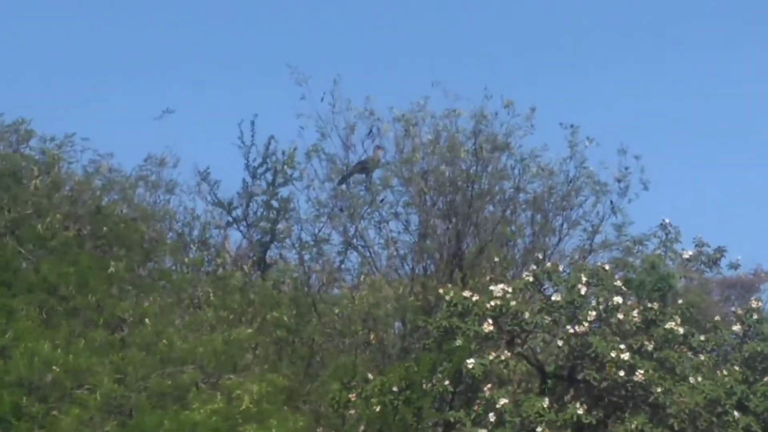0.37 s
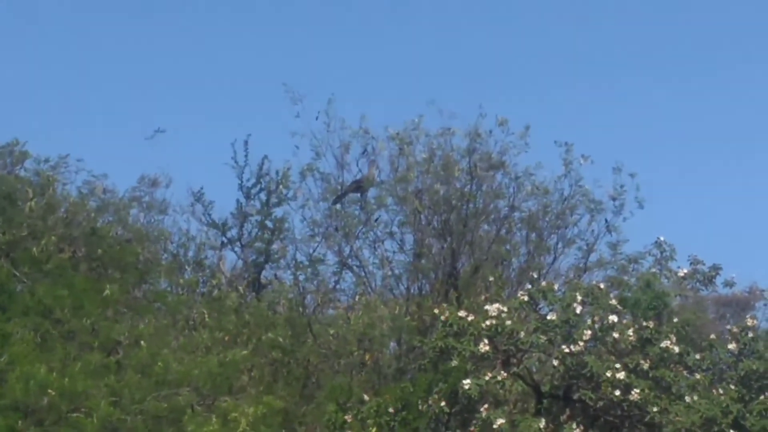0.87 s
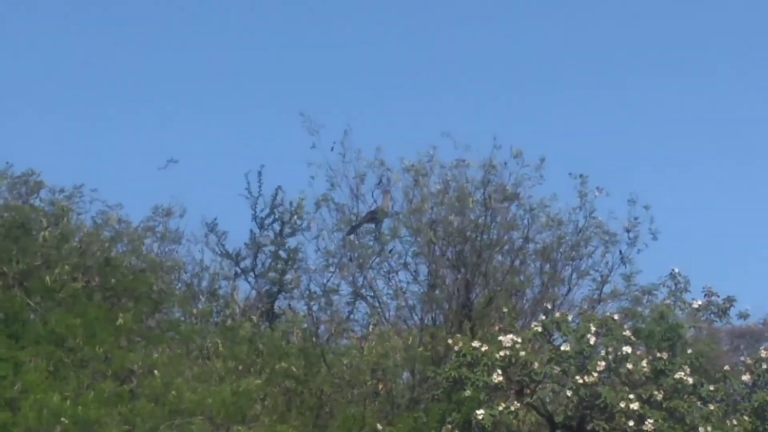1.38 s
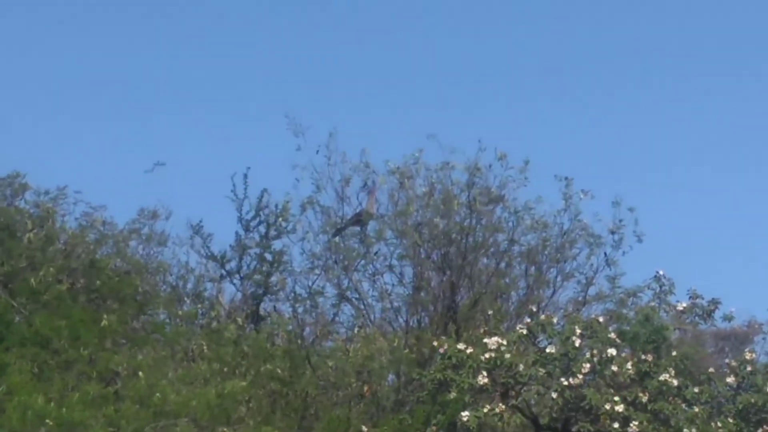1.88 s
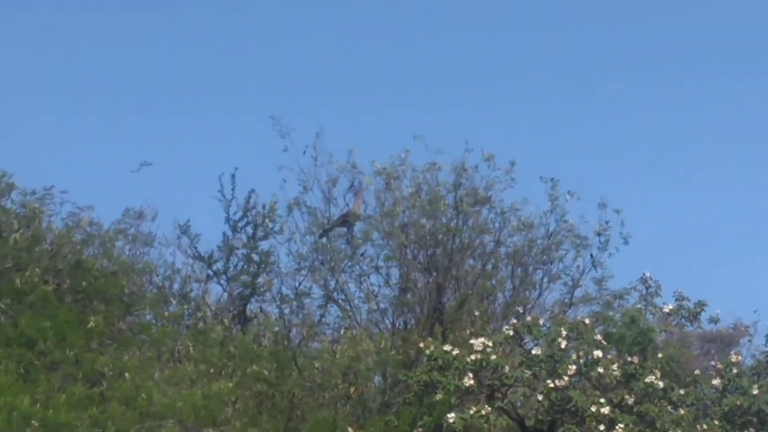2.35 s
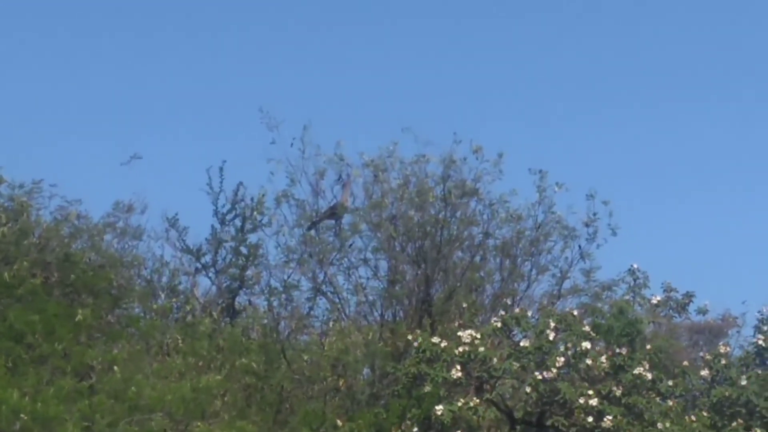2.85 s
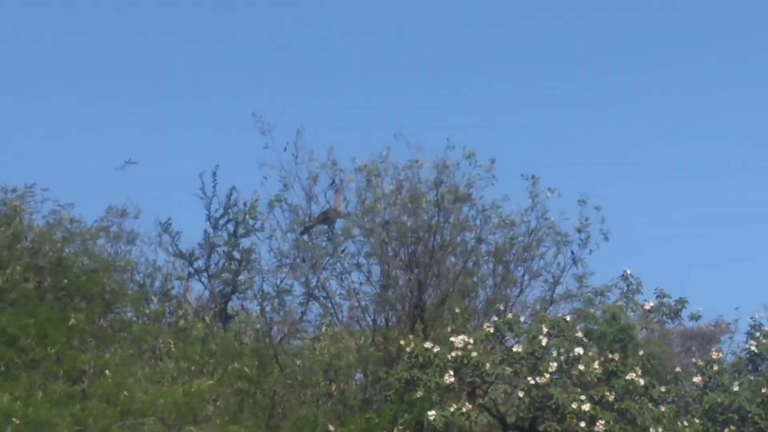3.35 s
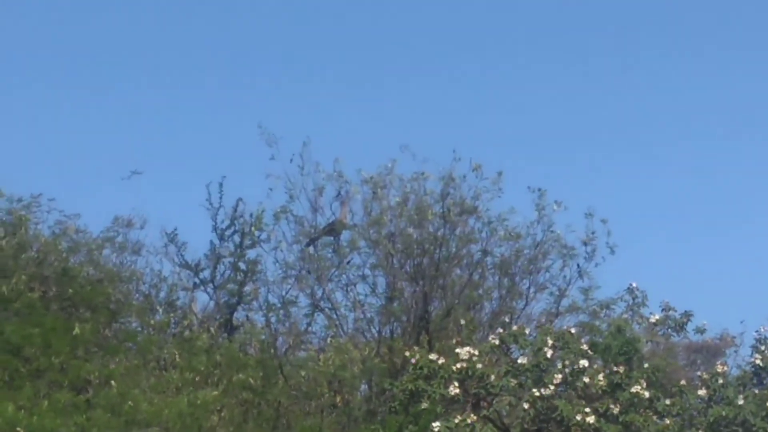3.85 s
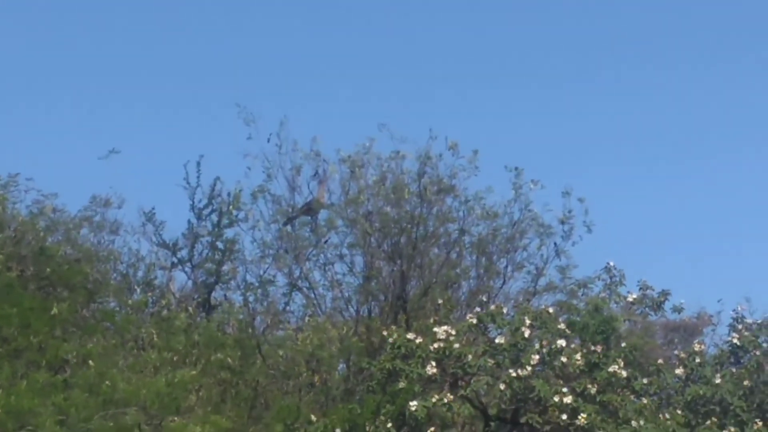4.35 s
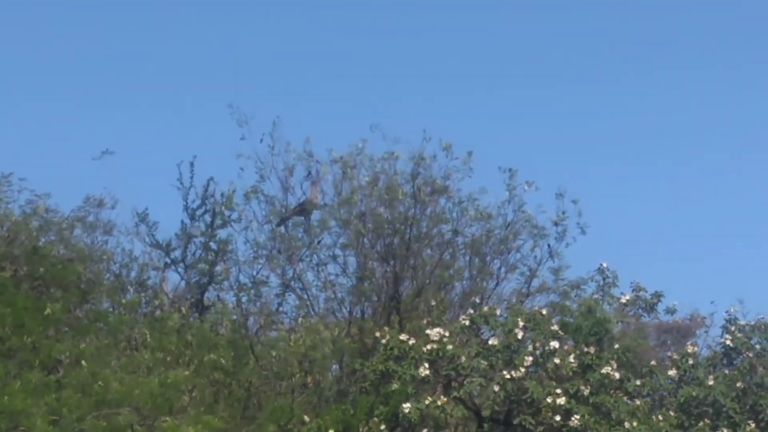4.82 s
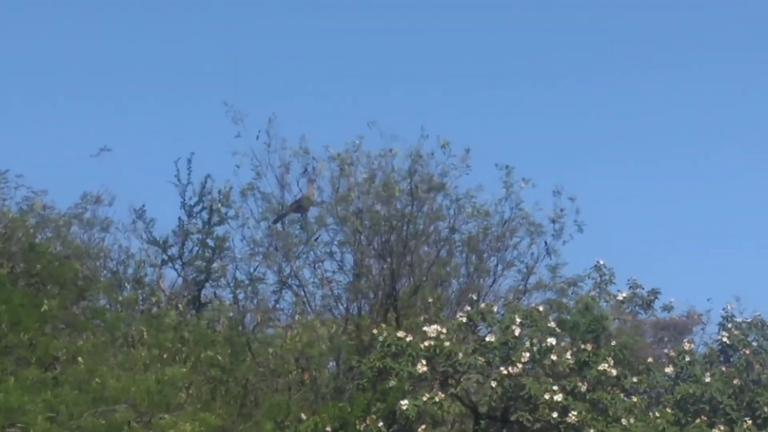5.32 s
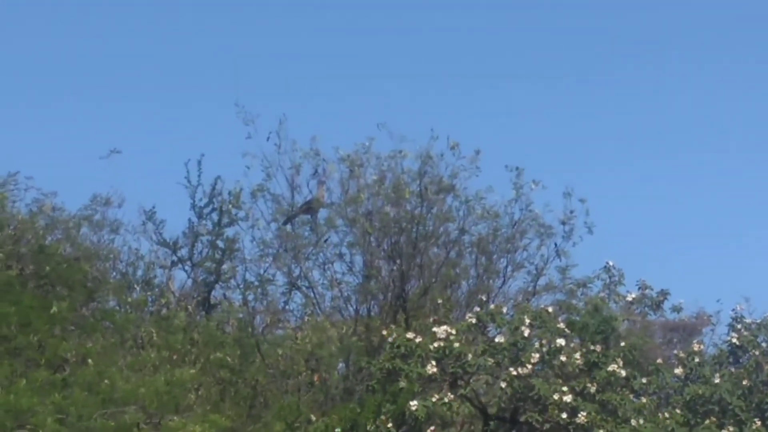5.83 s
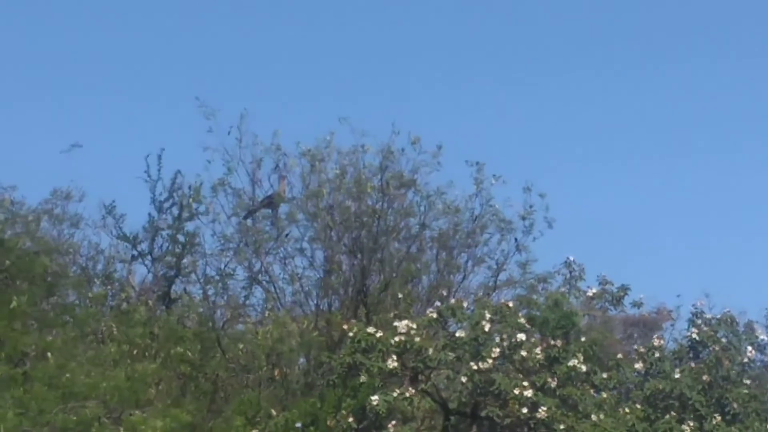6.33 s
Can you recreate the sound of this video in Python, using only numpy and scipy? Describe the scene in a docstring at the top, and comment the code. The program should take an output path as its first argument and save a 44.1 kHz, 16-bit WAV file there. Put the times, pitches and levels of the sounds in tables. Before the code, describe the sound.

A large bird gives raucous, rasping three-part honks that swell louder, answered by fainter hoarse calls farther off among scrubby trees, over low hum.

```python
"""A large bird in a scrubby tree gives a faint single call, then four raucous three-part honks: pulses and breath
ring its throat and beak. Others of its kind answer farther off, one a clearer, higher voice of summed harmonics.
A small bird chips and insects tick in sliding sines; insect hiss, snaps, knocks and distant hum are shaped noise.
A two-port microphone widens the picture by feeding each side, delayed and inverted, into the other."""
import sys
import numpy as np
from scipy import signal
from scipy.fft import rfft, irfft
from scipy.io import wavfile
from scipy.ndimage import uniform_filter1d

SR = 44100
rng = np.random.default_rng(int(sys.argv[2]) if len(sys.argv) > 2 else 0)


def ratio_of_db(decibels):
    """Turn decibels (scalar or array-like) into linear amplitude factors; 0 dB maps to 1."""
    return 10 ** (np.asarray(decibels, float) / 20)


def file_out(sig):
    """Save sig as 16-bit WAV at sys.argv[1]."""
    # one column per channel
    cols = np.atleast_2d(sig).T
    # limit, then scale
    lim = np.clip(cols, -1, 1)
    pcm = np.round(lim * 32767).astype(np.int16)
    wavfile.write(sys.argv[1], SR, pcm)


N = 295470
HZ = np.maximum(np.fft.rfftfreq(N, 1 / SR), 1)


def rms_one(x):
    """Normalisation: scale to rms 1."""
    return x / np.sqrt(np.mean(x ** 2) + 1e-20)


def at_hz(points):
    """Interpolation on a logarithmic frequency axis: a (Hz, value) table read at every frequency."""
    return np.interp(np.log(HZ), np.log(np.array(points)[:, 0]), np.array(points)[:, 1])


def coloured(x, points):
    """Linear filtering: multiply the spectrum by a (Hz, dB) response."""
    return irfft(rfft(x) * ratio_of_db(at_hz(points)), N)


def phrases(tables, level):
    """Envelope control: join tables in time; the level column becomes a gain, zero between tables."""
    t = np.arange(N) / SR
    s, *columns = np.transpose(np.concatenate(tables))
    columns = [np.interp(t, s, c) for c in columns]
    sounding = sum((t > rows[0][0]) & (t < rows[-1][0]) for rows in tables) > 0
    columns[level] = ratio_of_db(columns[level]) * uniform_filter1d(sounding * 1.0, size=300)
    return columns


def notes(rows, shape):
    """Time scaling: stretch a note shape over each row, as tables of (s, pitch Hz, level dB, overtones dB)."""
    return [[(s + u * length, hz * ratio, db + rel_db, top_db) for u, ratio, rel_db in shape]
            for s, length, hz, db, top_db in rows]


def drift(rate_hz):
    """Low-passed noise: a random wander of rms 1, two equal poles at rate_hz."""
    r = np.exp(-2 * np.pi * rate_hz / SR)
    wander = signal.lfilter([1], [1, -2 * r, r * r], rng.standard_normal(N + 9000))
    return rms_one(wander[9000:])  # skip the filter's start


def rings(x, hz, width_hz):
    """Resonance by heterodyning: shift a centre that may move to zero, low-pass twice, shift back; rms 1."""
    turn = np.exp(2j * np.pi * np.cumsum(hz * np.ones(N)) / SR)
    r = np.exp(-np.pi * width_hz * 1.5 / SR)  # each pass is wider, since two in a row narrow the band
    return rms_one(np.real(signal.lfilter([1], [1, -2 * r, r * r], x / turn) * turn))


def evened(x, share):
    """Level compression: take out part of the slow level wander; rms 1."""
    return rms_one(x / (uniform_filter1d(x ** 2, size=900) + 1e-9) ** (share / 2))


def placed(x, lead_ms, pan_db):
    """Interaural-like cues: above the bass the left port leads by lead_ms and is pan_db louder."""
    sided = 1 / (1 + (785 / HZ) ** 2)  # the close ports hear the bass alike
    half = ratio_of_db(pan_db * sided / 2) * np.exp(1j * np.pi * HZ * sided * lead_ms / 1000)
    return irfft(rfft(x) * np.array([half, 1 / half]), N)


def among_trees(x, level_db, t60):
    """Diffuse reverberation: dense scatter off trunks and leaves, its own on each side."""
    # Leaves scatter the treble most. Each row: frequency in Hz, gain in dB.
    scatter = [(500, -8), (1200, 0), (2500, 4), (8000, 6)]
    t = np.arange(SR // 2) / SR
    tail = rng.standard_normal((2, len(t))) * ratio_of_db(-60 * t / t60) * (t > .004)
    tail /= np.sqrt(np.sum(tail ** 2, axis=1, keepdims=True))
    return ratio_of_db(level_db) * signal.fftconvolve(coloured(x, scatter)[None], tail, axes=1)[:, :N]


def add(out, s, shape):
    """Superposition: mix a short shape in at a time."""
    i = round(s * SR)
    out[..., i:i + shape.shape[-1]] += shape[..., :N - i]


def air():
    """Partial coherence: steady wide noise from a shared and an opposed part, most alike near 300 Hz."""
    # Hum, air and capsule hiss. Each row: frequency in Hz, spectral density in dB per Hz.
    density = [(25, -110), (45, -83), (75, -74), (150, -75), (250, -81), (500, -89.5), (900, -97),
               (1500, -102), (3000, -105), (6000, -110), (9000, -114), (14000, -116)]
    # Each row: frequency in Hz, left-right correlation at the ports.
    likeness = [(60, 0.48), (300, 0.63), (800, 0.42), (2000, 0.34)]
    shared, apart = rfft(rng.standard_normal((2, N))) * ratio_of_db(at_hz(density)) * np.sqrt(SR / 4)
    alike = np.clip(at_hz(likeness), -.99, .99)
    return irfft(np.sqrt(1 + alike) * shared + np.sqrt(1 - alike) * apart * [[1], [-1]], N)


def insect_hiss(flutter_db):
    """Amplitude-modulated band noise: a high hiss that swells and flutters, stronger on the right."""
    # Each row: time in seconds, level in dB ahead of the side gains.
    buzz = [(0, -75.5), (.12, -75), (.38, -73), (.46, -91), (5.8, -78), (5.95, -77), (6.08, -76),
            (6.15, -103), (6.7, -83)]
    band = signal.butter(2, [11500, 14000], "band", fs=SR, output="sos")
    hiss = rms_one(signal.sosfilt(band, rng.standard_normal((2, N))))
    side_gain = ratio_of_db(np.array([[-3.0], [2.5]]))
    return phrases([buzz], level=0)[0] * ratio_of_db(flutter_db * drift(40.0)) * hiss * side_gain


def snaps_and_knocks(decay_ms):
    """Impulsive excitation: decaying noise, bright for dry snaps, low-passed for knocks on the housing."""
    # Dry snaps. Each row: start in seconds, level in dB, left minus right in dB.
    cracks = [(.8895, -35.5, 2), (2.182, -44, -3), (5.113, -43.5, -15)]
    # Dull knocks. Each row: start in seconds, level in dB, left minus right in dB.
    knocks = [(.374, -50, 6), (6.2, -42, 6)]
    out, t, sides = np.zeros((2, N)), np.arange(600) / SR, np.array([[.5], [-.5]])
    band = signal.butter(1, [5000, 8500], "band", fs=SR, output="sos")
    for s, level_db, pan_db in cracks:
        crack = signal.sosfilt(band, rng.standard_normal((2, 600)))
        add(out, s, ratio_of_db(level_db + pan_db * sides) * crack * np.exp(-t * 1000 / decay_ms))
    for s, level_db, pan_db in knocks:
        knock = signal.lfilter([.3], [1, -.75], rng.standard_normal(600))
        add(out, s, ratio_of_db(level_db + pan_db * sides) * knock * np.exp(-t * 770.0))
    return out


def whistles(rows, length_s, fall):
    """Frequency modulation: short sine notes that slide down by a share of their middle pitch."""
    out, u = np.zeros(N), np.linspace(0, 1, round(length_s * SR))
    for s, peak_db, hz in rows:
        phase = 2 * np.pi * np.cumsum(hz * (1 + fall * (.5 - u))) / SR
        add(out, s - .003, ratio_of_db(peak_db) * np.sin(np.pi * u) ** 2 * np.sin(phase))
    return out


def insect_ticks():
    """Brief tone bursts: each tick is a very short high sine."""
    # Each row: time in seconds (3 ms after the start), peak in dB, middle pitch in Hz.
    ticks = [(0.2129, -59, 11600), (0.5197, -63, 11200), (0.6799, -59, 11200), (0.847, -62, 11200),
             (1.034, -60, 11600), (2.9567, -60.5, 11700), (3.7447, -61, 11250), (4.8254, -59, 11800),
             (5.7538, -60, 11400), (6.2342, -63, 11600)]
    return whistles(ticks, 0.0087, fall=0.07)


def small_bird():
    """Near-sinusoidal phonation: each chip is one short falling whistle."""
    # Each row: time in seconds (3 ms after the start), peak in dB, middle pitch in Hz.
    chips = [(0.0323, -50, 3950), (1.209, -57.5, 3850), (1.356, -63.5, 3700), (1.391, -57, 4030),
             (2.9512, -53, 3960), (3.717, -58, 4040), (4.63, -47, 3930), (4.8254, -42, 3970),
             (5.0096, -45.5, 3957), (5.2214, -48, 3900), (5.4176, -44, 3960), (5.6134, -51.5, 3950),
             (6.3949, -61, 3893), (6.5675, -72.5, 3990)]
    return whistles(chips, 0.018, fall=0.069)


def clear_voice(wobble, flutter_db, husk_db):
    """Source and filter: steady, slightly husky harmonics picked out by the throat, wavering through leaves."""
    # Throat response. Each row: frequency in Hz, gain in dB.
    throat = [(600, -25), (1100, -18), (1500, 0), (2000, -3), (2300, -10), (3000, -11), (3400, -22),
              (3700, -14), (3920, -3), (4400, -26), (7000, -45)]
    # Each row: start in seconds, length in seconds, pitch in Hz, level in dB, fourth harmonic and up in dB.
    rising_notes = [(5.102, .083, 744.6, -49.5, -2), (6.135, 0.1, 743, -50, -1),
                    (6.310, .095, 735, -47, -7.5)]
    # The same columns, for notes that rise and fall.
    arched_notes = [(5.220, .155, 977, -47, -0.5), (6.450, .16, 976, -50, -9.5)]
    # The voice breaks between a low and a high register.
    # Each row: share of the length, pitch ratio, level in dB.
    rising = [(0, .92, -7), (0.151, .97, -3), (0.701, 1.04, -1.5), (.8, 1.36, -7), (1, 1.4, -8)]
    # The same columns, for the arched note.
    arched = [(0, .62, -14), (0.131, .77, -1.5), (.23, .995, -5.5), (0.731, 1.005, -3.5), (.82, .775, 1.5),
              (1, .69, -6)]
    tables = sorted(notes(rising_notes, rising) + notes(arched_notes, arched))
    pitch_hz, level, top_db = phrases(tables, level=1)
    phase = 2 * np.pi * np.cumsum(pitch_hz * (1 + wobble * drift(62.5))) / SR
    hz, throat_db = np.transpose(throat)
    tone = np.zeros(N)
    for k in range(1, 8):
        gain_db = np.interp(k * pitch_hz, hz, throat_db) + top_db * (k > 3) + flutter_db * drift(21.0)
        tone += ratio_of_db(gain_db) * np.sin(k * phase)
    roughness = np.where(pitch_hz < 900, 1.7, 1)  # the low register is rougher
    return level * tone * (1 + ratio_of_db(husk_db) * roughness * drift(400.0))


def syllables(rows, release_db_per_s, upper_db, weakest_db):
    """Effort envelope: attack, swell and release; the strongest syllable at each moment sets the voice."""
    full_effort_db, tiring_db_per_s, attack_db_per_s = -27, 24.5, 2600
    start, length, peak_db, swell_db, hz, rasp_db = np.transpose(rows)[:, :, None]
    since = np.arange(N) / SR - start
    u = np.clip(since / length, 0, 1)
    fallen_db = release_db_per_s * np.maximum(since - length, 0)
    # the swell flattens toward its peak, sooner the less it has to gain
    building_db = -swell_db * (1 - u) ** (1.1 + 12 / (np.abs(swell_db) + 3.0))
    # the effort sags while a syllable is held; the opening is sudden
    effort_db = peak_db + building_db - tiring_db_per_s * u * length - fallen_db
    effort_db += attack_db_per_s * np.minimum(since, 0)
    now = np.argmax(effort_db, axis=0), np.arange(N)
    fallen_db = np.minimum(fallen_db[now], 30)
    short_db = np.clip(peak_db[now[0], 0] - full_effort_db, -weakest_db, 0)
    # the beak rasps most in mid syllable and dies faster than the throat
    rasp_db = (rasp_db - 3 * (2 * u - 1) ** 2)[now] - 0.05 * fallen_db
    # the upper ring gains with the effort of the syllable and is spared part of the release
    upper_db = upper_db + 0.52 * short_db + 0.12 * fallen_db
    building_db = np.clip(building_db[now] + 2.5, -18, 0)
    controls = building_db, fallen_db, short_db, hz[now[0], 0] * 1.0, upper_db, rasp_db
    return [ratio_of_db(effort_db[now])] + [uniform_filter1d(c, size=200) for c in controls]


def hoarse_voice(controls, pitch_hz, sag, ring_sag, wander, jitter, uneven_db, breath, chest_db):
    """Source and filter: membranes snap shut once a cycle, unevenly, with pulsing breath, and ring the throat."""
    # Beak rasp. Each row: frequency in Hz, relative gain in dB.
    rasp = [(1300, -36), (1750, 7.5), (2400, 9), (2800, 10.5), (3500, 3.5), (4400, 1.5), (5200, -3),
            (6500, -9), (7400, -20), (9500, -26), (11500, -28.5), (14000, -46)]
    effort, building_db, fallen_db, short_db, lower_hz, upper_db, rasp_db = controls
    # pitch climbs as the effort builds; weaker syllables sit lower
    slack = (1 + .007 * short_db) * (1 + sag * building_db)
    pitch = pitch_hz * slack * (1 + .015 * drift(25.0))
    cycles = np.cumsum(pitch * (1 + jitter * drift(150.0))) / SR
    closing = np.diff(np.floor(cycles), prepend=0) > 0
    strength = ratio_of_db(uneven_db * drift(250.0) + 0.49 * drift(68.0))
    leak = rng.standard_normal(N) * (1 + np.cos(2 * np.pi * cycles)) * strength
    source = rms_one(closing * strength) + breath * rms_one(leak)
    # the throat never holds quite still
    lower_hz = lower_hz * (1 + ring_sag * (building_db - 0.13 * fallen_db)) * (1 + wander * drift(29.57))
    upper_hz = 1435 * (1 + wander * drift(26.0))
    lower = evened(rings(source, lower_hz, 80), share=0.38)
    skirt = rings(source, 1067.0, 121.0)  # under the lower ring
    broad = rings(source, 1544.0, 263.0)  # breathy, stronger while building
    chest = evened(rings(source, .96 * pitch, 75), share=0.089)
    upper = evened(rings(source, upper_hz, 80), share=0.52)
    voice = ratio_of_db(-2.0 + 0.56 * building_db) * lower
    voice += ratio_of_db(-12.5 - 0.12 * short_db) * skirt
    voice += ratio_of_db(upper_db - 2.5 - 0.56 * building_db - 0.49 * short_db) * broad
    voice += ratio_of_db(chest_db + 0.1 * building_db - 0.53 * fallen_db) * chest  # the chest fades faster
    voice += ratio_of_db(upper_db + 1.0 * building_db) * upper
    voice += ratio_of_db(rasp_db) * evened(coloured(source, rasp), share=0.3)
    return effort * voice


def far_birds():
    """Propagation loss: hoarse answers coloured by air and leaves, and one clearer voice."""
    # Each row: start in seconds, length in seconds, peak effort in dB, effort gained on the way in dB,
    # lower throat ring in Hz, beak rasp in dB against the effort.
    answers = [(1.200, .14, -65, 5.966, 1230, -4), (2.100, .08, -52, 12, 1179, -4.5),
               (2.860, .06, -48.5, 2, 1270, -1.5), (2.960, .115, -48, 9, 1291, -1),
               (3.695, 0.078, -50.5, 6, 1340, -3), (3.805, .08, -52, 2.4, 1299, -5),
               (4.500, .21, -53.5, 4, 1365, -4), (4.760, .10, -51, 2, 1288, -9),
               (4.895, .14, -49.5, 1.2, 1286, -11), (5.385, .08, -54.5, 0.64, 1426, -8.5),
               (5.510, .14, -51, 9, 1364, -4.5), (5.700, .135, -50.5, 7, 1292, -4),
               (5.875, .165, -53, 5, 1254, -3), (6.615, .10, -49.5, 6, 1328, -8)]
    # Air and leaves. Each row: frequency in Hz, gain in dB.
    far_loss = [(500, 14), (1000, -3.5), (3000, 4), (6000, 1.5), (12000, 3)]
    controls = syllables(answers, release_db_per_s=350, upper_db=-10.5, weakest_db=0)
    hoarse = hoarse_voice(controls, pitch_hz=655, sag=0.012, ring_sag=0.0075, wander=0.071,
                          jitter=.06, uneven_db=-0.5, breath=0.73, chest_db=-22)
    return coloured(hoarse, far_loss) + clear_voice(wobble=.005, flutter_db=2.5, husk_db=-13.0)


def near_bird():
    """Effort-driven phonation: each three-part honk is a slow swell, a short bark and a held blast."""
    # One row a syllable. Each row: start in seconds, length in seconds, peak effort in dB,
    # effort gained on the way in dB, lower throat ring in Hz, beak rasp in dB against the effort.
    honks = [(.910, .14, -50.5, 20, 1150, -7), (1.495, 0.17, -38, 24, 1204, -6),
             (1.763, 0.059, -35, 6, 1160, -4), (1.896, 0.12, -33, 4, 1178, -5.5),
             (2.255, .19, -26, 30, 1213, -1.5), (2.542, 0.071, -29, 6, 1219, -3),
             (2.672, 0.14, -28, 4.5, 1193, -2.5), (3.085, .15, -23, 23, 1265, -1.5),
             (3.338, 0.064, -25, 7.5, 1250, -3), (3.455, 0.15, -25.5, 8, 1228, 0.5),
             (3.890, .17, -22, 26, 1243, -0.5), (4.141, .072, -24, 9.5, 1238, -1),
             (4.258, 0.15, -26, 6.5, 1220, 0)]
    controls = syllables(honks, release_db_per_s=400, upper_db=-5, weakest_db=20)
    return hoarse_voice(controls, pitch_hz=710.6, sag=.009, ring_sag=0.0062, wander=0.013,
                        jitter=.036, uneven_db=2.2, breath=.85, chest_db=-11.5)


def scene():
    """Superposition: near bird, far birds, small life and air summed at the two ports."""
    near, far = near_bird(), far_birds()
    small = small_bird() + insect_ticks()
    out = placed(near, lead_ms=.25, pan_db=6) + among_trees(near, level_db=-5, t60=.08)
    out += placed(far, lead_ms=.25, pan_db=14) + among_trees(far, level_db=-6, t60=.14)
    out += placed(small, lead_ms=.02, pan_db=-1.5) + snaps_and_knocks(decay_ms=2.0)
    return ratio_of_db(-0.5) * out + air() + insect_hiss(flutter_db=4.0)  # all but air and hiss 0.5 dB down


def low_pass(x):
    """Removes everything above the highest recorded frequency."""
    return signal.sosfilt(signal.butter(12, 14670, fs=SR, output="sos"), x)


def record(dry):
    """Comb filtering: each side takes away a delayed share of the other; the top is cut."""
    # Each row: frequency in Hz, share fed across.
    cross_share = [(200, 0.16), (700, 1), (1300, 0.82), (2500, 0.37), (5000, 0.5), (9000, 0.53),
                   (14000, 0.11)]
    cross_ms, cutoff_hz = 0.39, 14250
    across = np.clip(at_hz(cross_share), 0, .95) * np.exp(-2j * np.pi * HZ * cross_ms / 1000)
    wide = irfft((rfft(dry) - rfft(dry[::-1]) * across) * (HZ < cutoff_hz), N)
    return low_pass(wide)


dry = scene()
out = record(dry)
file_out(out)
```